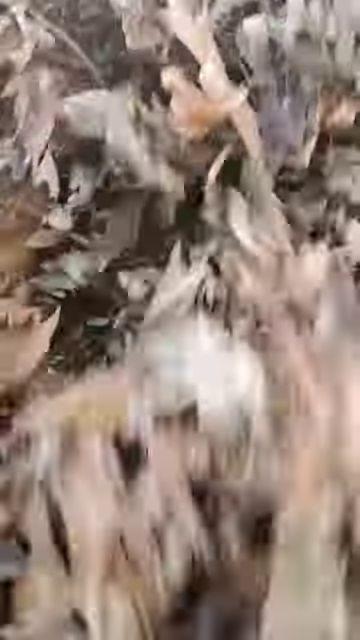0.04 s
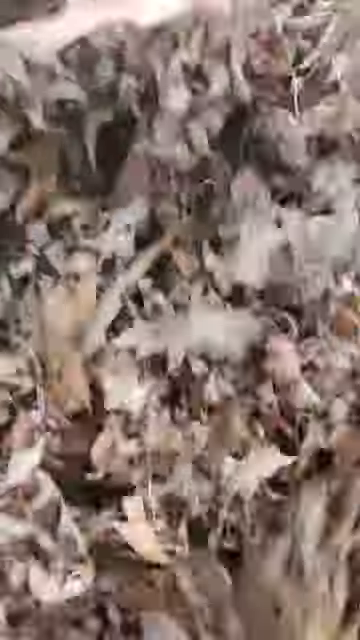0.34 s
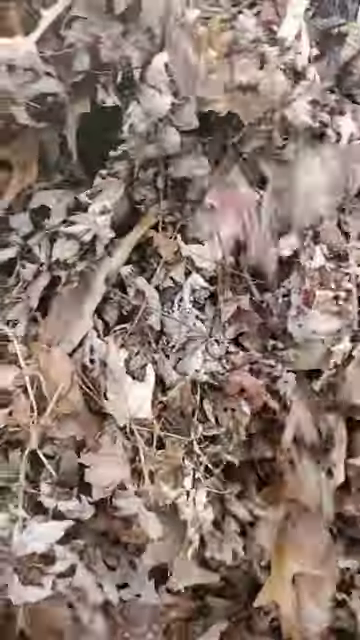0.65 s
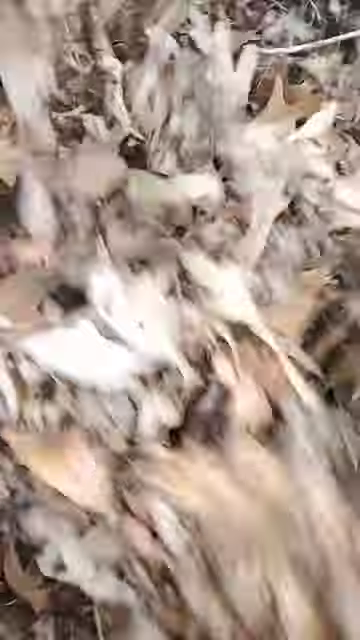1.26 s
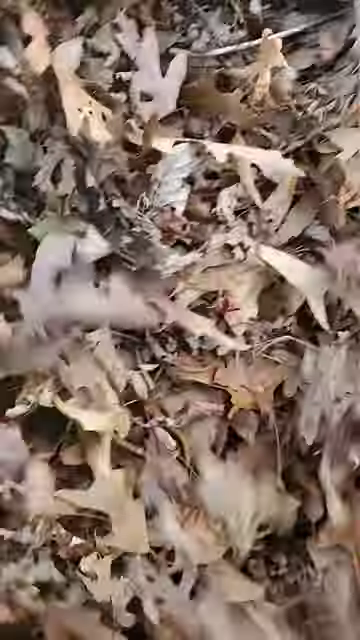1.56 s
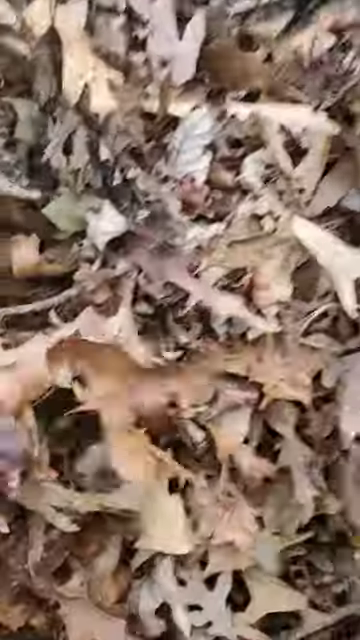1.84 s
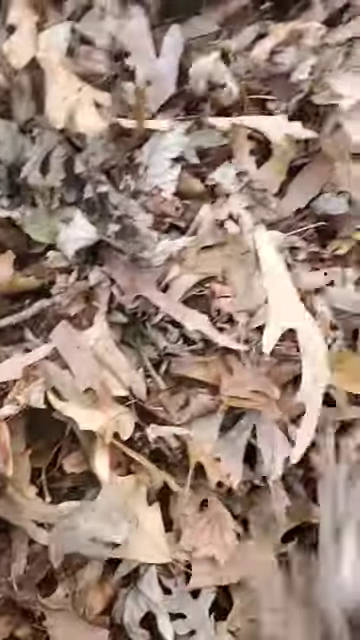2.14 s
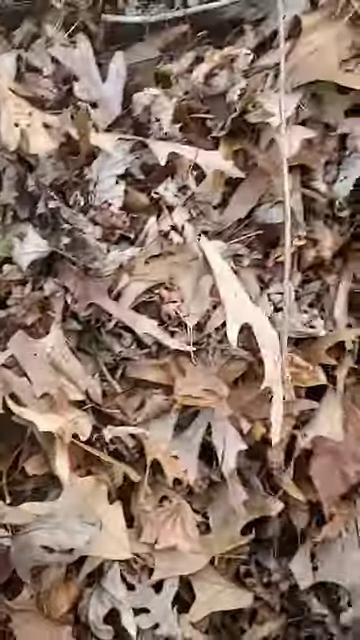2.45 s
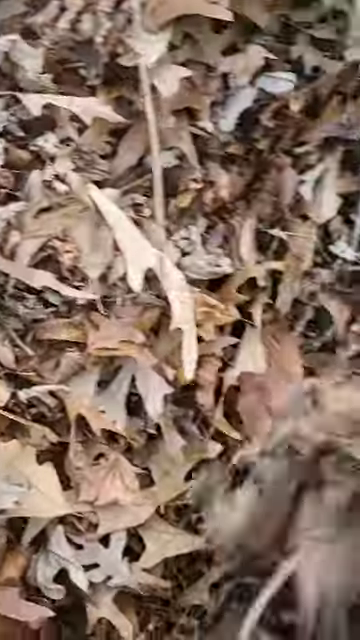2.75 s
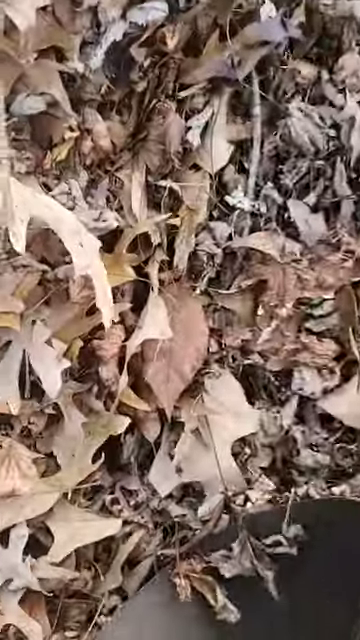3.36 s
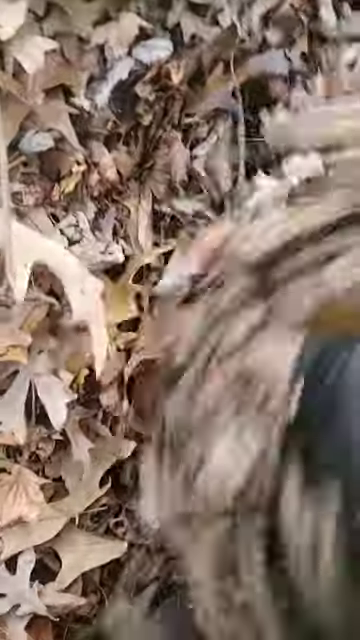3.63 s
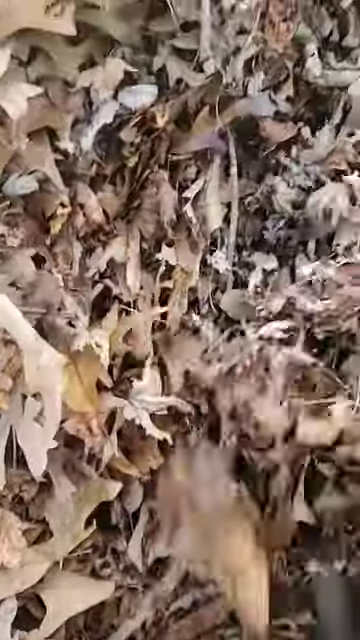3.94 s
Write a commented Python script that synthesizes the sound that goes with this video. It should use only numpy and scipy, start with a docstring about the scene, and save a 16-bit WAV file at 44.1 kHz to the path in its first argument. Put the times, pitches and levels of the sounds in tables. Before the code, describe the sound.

A petrol leaf vacuum runs close by throughout, a loud hum over engine throb and rushing air, while dry leaves sizzle and rattle up the hose. Near 0.25 seconds the air surges and the hum sags. Clumps crunch around 0.85 seconds, the sizzle swells at 1.5, and more crunches come near 1.9. A leaf snaps at 2.4; after crunches at 2.55 and 3.25, the leaves thin briefly.

```python
"""A petrol leaf vacuum runs flat out, close by, its hose sucking up dry leaves. From the start the
four-blade impeller hums over the engine's throb and a roar of air, while leaves sizzle at the mouth
and rattle up the hose. Near 0.25 s a wad is swallowed: the roar surges and the hum sags under load.
Clumps crunch against the hose wall around 0.85 s, the sizzle swells at 1.5 s and more clumps follow.
A leaf snaps sharply at 2.4 s; after crunches near 2.55 s and 3.25 s the leaves thin out briefly."""
import sys
import numpy as np
from scipy import signal
from scipy.fft import rfft, irfft
from scipy.io import wavfile
from scipy.ndimage import uniform_filter1d, minimum_filter1d

SR = 44100
rng = np.random.default_rng(int(sys.argv[2]) if len(sys.argv) > 2 else 0)


def store_pcm(level_fs):
    """Save levels as 16-bit WAV."""
    pcm = np.round(np.clip(level_fs, -1, 1) * 32767).astype(np.int16)
    wavfile.write(sys.argv[1], SR, np.atleast_2d(pcm).T)


N = 176400
T, HZ = np.arange(N) / SR, np.fft.rfftfreq(N, 1 / SR)
BLADES, TOP_HZ = 4, 15600


def amp(db):
    """Decibels to gain."""
    return 10 ** (np.asarray(db) / 20)


def unit(x):
    """Scales to rms 1."""
    return x / np.sqrt(np.mean(x ** 2) + 1e-20)


def curve(points):
    """Automation: straight lines between (time [s], value) rows."""
    return np.interp(T, *np.transpose(points))


def spectrum(points):
    """Joins (frequency [Hz], value) rows on a log-frequency axis."""
    hz, value = np.transpose(points)
    return np.interp(np.log(HZ + 1), np.log(hz + 1), value)


def bumps(rows):
    """Bell-shaped swells or dips, one for each (time [s], half-width [s], height) row."""
    return sum(height * np.exp(-((T - time) / width) ** 2) for time, width, height in rows)


def spike(time, attack_s, decay_s):
    """An envelope that rises exponentially to 1 at the given time, then dies away."""
    return np.exp(-abs(T - time) / np.where(T < time, attack_s, decay_s))


def drift(rate_hz):
    """Slow random motion of rms 1."""
    return unit(irfft(rfft(rng.standard_normal(N)) / (1 + (HZ / rate_hz) ** 4), N))


def pan_gains(pan_db):
    """Left and right gains with a mean of 1."""
    gains = np.array([amp(pan_db / 2), amp(-pan_db / 2)])
    return gains / gains.mean(0)


def flicker(x, depth_db, rate_hz, bands, low_hz=1000):
    """Lets each band of the spectrum flicker on its own."""
    bins, centres = rfft(x), np.geomspace(low_hz, TOP_HZ, bands)
    split = (irfft(bins * spectrum(list(zip(centres, band))), N) for band in np.eye(bands))
    return unit(sum(band * amp(depth_db * drift(rate_hz)) for band in split))


def resonate(x, hz, width_hz):
    """A broad resonance of gain 1 that sweeps along the curve hz."""
    carrier = np.exp(2j * np.pi * np.cumsum(hz) / SR)
    pole = np.exp(-np.pi * width_hz / SR)
    return 2 * (carrier * signal.filtfilt([1 - pole], [1, -pole], x / carrier)).real


# Stereo image, tight lows and wide highs (frequency [Hz], left-right correlation [0..1])
CORRELATION = [(50, 1), (300, 0.97), (550, 0.87), (1000, 0.63), (2000, 0.39), (2800, 0.41), (4000, 0.19),
               (9000, .1)]
# Phase between the sides (frequency [Hz], lag of the left [rad])
LEFT_LAG = [(60, .2), (240, 0.65), (780, 1.0), (1100, 1.66), (1720, 3.5), (2100, 3.5), (2840, 4),
            (7000, 11)]


def place(pair, eq, pan):
    """Equalises two unrelated signals and blends them to stereo; the mono mix has the input's level."""
    left, other = rfft(pair)
    shared = np.clip(spectrum(CORRELATION), 0, 1)
    right = (shared * left + np.sqrt(1 - shared ** 2) * other) * np.exp(1j * spectrum(LEFT_LAG))
    stereo = irfft(np.array([left, right]) * unit(amp(spectrum(eq))) * pan_gains(spectrum(pan)), N)
    return stereo * pair.std() / stereo.mean(0).std()


# Fader of the air bed (time [s], level [dB])
ROAR_FADER = [(0, -32), (.6, -29.5), (1.3, -30), (1.9, -29), (2.3, -30), (2.8, -28.5), (3.3, -29),
              (4, -30.5)]
# Surges as a wad is swallowed (time [s], half-width [s], gain [dB])
ROAR_GULPS = [(0.228, 0.047, 6.5), (0.828, 0.026, 1), (1.988, 0.022, 2), (2.555, .025, 4), (3.26, .05, 0)]
# Bass-heavy tone of the air (frequency [Hz], relative level [dB])
ROAR_EQ = [(20, -39.5), (36, -24), (60, -2.5), (110, -7), (170, 1), (280, -2.5), (400, -5.5), (540, -12),
           (700, -12), (800, -20), (1050, -16.5), (1500, -24.5), (2000, -25), (2600, -28), (6000, -44.5),
           (16000, -51.5)]
# Position of the air and the wads it carries (frequency [Hz], left minus right [dB])
AIRFLOW_PAN = [(50, 5.5), (200, -4.5), (1200, -4.5), (3000, -3.5), (8000, -3.5), (15000, 0)]


def roar(angle):
    """Turbulent air, pulsing with the shaft and surging at each gulp."""
    air = flicker(rng.standard_normal((2, N)), depth_db=1.47, rate_hz=14, bands=20, low_hz=292)
    pulse = 1 + 0.078 * (np.cos(angle) + np.cos(2 * angle) + np.cos(BLADES * angle))
    return place(air, ROAR_EQ, AIRFLOW_PAN) * unit(pulse) * amp(curve(ROAR_FADER) + bumps(ROAR_GULPS))


def crackle(per_s, spread_db, hiss, grain_s):
    """Countless tiny leaf fractures of random size, over the hiss of those too small to tell apart."""
    onsets = rng.random(N) < per_s / SR
    sizes = amp(spread_db * np.minimum(rng.exponential(1, N), 5))
    power = signal.lfilter([1], [1, -np.exp(-2 / (grain_s * SR))], (onsets * sizes) ** 2)
    return unit(np.sqrt(power / power.mean() + hiss ** 2) * rng.standard_normal((2, N)))


# Cues for wads entering the hose (time [s], half-width [s], level [dB])
WAD_CUES = [(0.274, 0.17, -43), (0.507, 0.022, -40), (0.85, 0.12, -43.5), (3.013, .04, -45),
            (3.25, 0.11, -43)]
# Midrange body of the scrape (frequency [Hz], relative level [dB])
WAD_EQ = [(400, -6.5), (700, -1), (1200, -1), (1800, -2.5), (2500, -5), (3600, -11.5), (8000, -31),
          (16000, -44.5)]


def wads():
    """Thick wads of leaves scrape with a low, coarse grain as they squeeze in."""
    envelope = bumps((time, width, amp(db)) for time, width, db in WAD_CUES)
    scrape = crackle(per_s=990, spread_db=1.0, hiss=0.94, grain_s=0.0022)
    return envelope * place(scrape, WAD_EQ, AIRFLOW_PAN)


# Cues for single leaves snapping (time [s], peak level before EQ [dB])
SNAP_CUES = [(.664, -36.5), (.732, -39), (.815, -37), (.848, -32.5), (1.004, -39), (2.402, -28),
             (3.18, -37.5), (3.273, -35), (3.457, -36.5), (3.58, -37), (3.625, -39)]


def snaps():
    """Dry leaves break with a sharp tick of noise."""
    envelope = sum(amp(db) * spike(time, attack_s=0.0008, decay_s=0.0042) for time, db in SNAP_CUES)
    return envelope * rng.standard_normal((2, N))


# Fader of the sizzle (time [s], level before trim [dB])
SIZZLE_FADER = [(0, -41), (.22, -41), (.53, -42.5), (.61, -46), (.67, -44), (.86, -43), (.92, -45.5),
                (1.07, -43.5), (1.19, -50), (1.28, -39), (1.52, -36), (1.68, -38), (1.73, -44),
                (2.02, -39.5), (2.11, -41.5), (2.16, -37.8), (2.56, -39), (2.62, -43.7), (2.82, -42.5),
                (2.9, -39.3), (3.03, -39.3), (3.08, -44.8), (3.28, -46), (3.36, -50), (3.59, -53.5),
                (3.68, -42), (3.97, -39.5)]
# Crisp, airy top of the leaves at the mouth (frequency [Hz], relative level [dB])
MOUTH_EQ = [(1000, -26.5), (2000, -14), (3000, -5), (6000, -8.5), (8500, -8.5), (10000, -5), (12000, -0.5),
            (14000, -1.5), (15500, 0)]
# Their stereo spread (frequency [Hz], left minus right [dB])
MOUTH_PAN = [(2500, 0), (5000, -8.5), (8000, 3.5), (10500, 0.5), (12500, 6.5), (15000, 15.5)]


def mouth(trim_db=1.5):
    """Loose leaves sizzle and snap in the draught at the hose's mouth."""
    leaves = crackle(per_s=6000, spread_db=1, hiss=0.67, grain_s=0.00047)
    sizzle = flicker(leaves, depth_db=1.8, rate_hz=36, bands=24) * amp(curve(SIZZLE_FADER) + trim_db)
    return place(sizzle + snaps(), MOUTH_EQ, MOUTH_PAN)


# Cues for hits on the hose wall (time [s], peak level before EQ [dB], attack [s], decay [s], centre [Hz])
CRUNCH_CUES = [(.503, -35, .008, .014, 2900), (.817, -29, .003, .01, 4700), (.838, -31.5, .01, .016, 4000),
               (.927, -35.5, .007, .01, 4200), (1.005, -30, .006, 0.008, 4720),
               (1.056, -33.5, .004, .008, 4213), (1.445, -38, .008, .015, 2300),
               (1.491, -35.5, .004, .007, 4530), (1.831, -29, .007, .022, 3630),
               (1.892, -34.5, .012, .014, 4300), (2.002, -30, .008, 0.013, 5700),
               (2.467, -35.5, 0.019, .015, 3500), (2.542, -29, .007, .016, 3400),
               (2.582, -31, 0.0067, 0.012, 3500), (2.722, -36.5, .018, .012, 4410),
               (2.844, -33.5, .004, .007, 5200), (3.191, -35.5, .004, .008, 3600),
               (3.222, -31.5, 0.0055, .014, 4630), (3.272, -28.5, .003, .007, 4500),
               (3.343, -34.5, 0.0045, 0.025, 4620)]


def crunches(width_hz=1600):
    """Clumps and twigs fold against the wall: each burst of fractures builds, then dies fast."""
    hits = np.zeros((2, N))
    for time, db, attack_s, decay_s, centre_hz in CRUNCH_CUES:
        burst = rng.standard_normal((2, N)) * spike(time, attack_s, decay_s)
        bell_eq = 0.37 + 1.18 / (1 + ((HZ - centre_hz) / (width_hz / 2)) ** 2)
        hits += amp(db) * irfft(rfft(burst) * bell_eq, N)
    return hits


# Fader of the rattle (time [s], level before trim [dB])
RATTLE_FADER = [(0, -42.5), (.11, -45), (.22, -41.5), (.53, -41.5), (.61, -47), (.66, -40.5), (.8, -39.5),
                (.85, -37), (.89, -41), (1.03, -41), (1.16, -45.5), (1.48, -41.5), (1.79, -40),
                (1.86, -36.5), (2.01, -36), (2.1, -45), (2.18, -39.5), (2.38, -44.5), (2.53, -38.5),
                (2.65, -38.5), (2.82, -40.5), (2.92, -44.5), (3.02, -39.5), (3.07, -45.5), (3.17, -44),
                (3.24, -37), (3.32, -41.5), (3.56, -49.5), (3.97, -41.5)]
# Resonance sweep, low for big clumps and high for small scraps (time [s], centre [Hz])
CLUMP_SWEEP = [(0, 4540), (.25, 2910), (.5, 3800), (.8, 4640), (1.05, 4520), (1.6, 3840), (1.85, 3600),
               (2.0, 5390), (2.25, 3940), (2.55, 3410), (2.75, 4620), (3.0, 4400), (3.3, 4880),
               (3.95, 4200)]
# Upper-mid bite of the leaves in the hose (frequency [Hz], relative level [dB])
HOSE_EQ = [(300, -26.5), (1400, -6), (2000, -3.5), (2800, -2), (3600, -5), (4700, -2.5), (6000, -3),
           (8000, -9), (11000, -13.5), (16000, -23.5)]
# Their stereo spread (frequency [Hz], left minus right [dB])
HOSE_PAN = [(1500, -4), (3200, -1), (4800, -5), (6500, 0), (8000, 5.5), (15000, 8.5)]


def hose(trim_db=-1):
    """Leaves and twigs scrape and knock along the hose, coloured by the size of the passing clump."""
    leaves = crackle(per_s=2700, spread_db=2, hiss=1, grain_s=0.00077)
    rattle = flicker(leaves, depth_db=2.0, rate_hz=35, bands=22) * amp(curve(RATTLE_FADER) + trim_db)
    clumps = 0.57 * resonate(rattle, curve(CLUMP_SWEEP), width_hz=2660)
    return place(rattle + clumps + crunches(), HOSE_EQ, HOSE_PAN)


def shaft_tone(angle, order):
    """A sine of rms 1 and random phase, locked to a multiple of the shaft speed."""
    return np.sqrt(2) * np.sin(order * angle + 2 * np.pi * rng.random())


# Partials of the engine (order [multiple of shaft speed], level before trim [dB])
ENGINE_PARTIALS = [(1, -37.5), (1.5, -42.5), (2, -39.5), (2.5, -46.5), (3, -36.5), (4.5, -40.5), (5, -43.5),
                   (5.5, -50), (6, -43.5), (6.5, -56.5), (9, -52.5), (10, -49), (12, -59)]


def engine(angle, roughness=0.47, trim_db=-1):
    """A four-stroke fires every second turn, so it throbs on half orders as well as whole ones."""
    return sum(amp(db + trim_db) * shaft_tone(angle, order) * (1 + roughness * drift(rate_hz=15))
               for order, db in ENGINE_PARTIALS)


# Fader of the hum, swelling and fading as the hose is moved about (time [s], level [dB])
HUM_FADER = [(0, -12), (.44, -11.6), (.73, -8.5), (.95, -9), (1.13, -6.5), (1.42, -6), (1.54, -9),
             (1.68, -8), (1.82, -9.5), (1.97, -9), (2.22, -6.5), (2.52, -6.5), (2.68, -9), (3.0, -6),
             (3.22, -5.5), (3.36, -7), (3.65, -5), (3.85, -7.5), (4, -6)]
# A brief dip in the hum (time [s], half-width [s], gain [dB])
HUM_DIPS = [(1.815, 0.017, -2)]
# Fader of the hum's octave (time [s], level before trim [dB])
OCTAVE_FADER = [(0, -34.5), (.22, -34), (.36, -47.5), (.8, -37.5), (.94, -41), (1.06, -34.5), (1.28, -33.5),
                (1.42, -34.5), (1.64, -35.5), (1.74, -40.5), (1.9, -41), (2.0, -35), (2.17, -33.5),
                (2.4, -37), (2.64, -36), (2.83, -31), (3.05, -33.2), (3.28, -33.2), (3.42, -32),
                (3.6, -32.4), (4, -32.6)]


def impeller(angle, flutter=0.03, octave_trim_db=1):
    """The passing blades chop the air into a loud hum and a faint octave above it."""
    hum = shaft_tone(angle, BLADES) * amp(curve(HUM_FADER) + bumps(HUM_DIPS))
    octave = shaft_tone(angle, 2 * BLADES) * amp(curve(OCTAVE_FADER) + octave_trim_db)
    return (hum + octave) * (1 + flutter * drift(rate_hz=25))


# Position of the motor, right of centre (time [s], left minus right [dB])
MOTOR_POSITION = [(0, -5.5), (.8, -4.5), (1.25, -5), (2.3, -5), (2.75, -4.7), (3.2, -4), (4, -5)]


def motor(shaft_hz, angle, left_delay_s=0.00025):
    """Impeller and engine turn on one shaft; their sound reaches the left side slightly later."""
    angles = np.array([angle - 2 * np.pi * shaft_hz * left_delay_s, angle])
    return (impeller(angles) + engine(angles)) * pan_gains(curve(MOTOR_POSITION))


# Pitch of the hum, sagging a little under load (time [s], blade-passing frequency [Hz])
BLADE_PITCH = [(0, 240.2), (.14, 236.4), (.31, 228), (.45, 232.3), (.7, 234.5), (.91, 233.1), (1.1, 236.3),
               (1.42, 236.1), (1.6, 236.9), (1.7, 232.1), (1.93, 232.6), (2.22, 236.3), (2.47, 236.5),
               (2.63, 233.4), (2.95, 236.7), (3.2, 236.7), (3.32, 233.6), (3.5, 235.4), (3.97, 237.8)]


def scene():
    """One slightly wavering shaft speed drives motor and air; the leaves sound on top."""
    blade_hz = curve(BLADE_PITCH) + 0.4 * drift(rate_hz=26.5)
    shaft_hz = blade_hz / BLADES
    angle = 2 * np.pi * np.cumsum(shaft_hz) / SR
    return motor(shaft_hz, angle) + roar(angle) + wads() + hose() + mouth()


def record(dry):
    """A fast limiter holds the highest crests of the hum; a steep low-pass trims the very top."""
    ceiling, window_samples = 0.99, 300
    safe_gain = np.minimum(1, ceiling / (abs(dry).max(0) + 1e-9))
    smooth_gain = uniform_filter1d(minimum_filter1d(safe_gain, window_samples), window_samples)
    low_pass = signal.firwin(511, TOP_HZ, window=("kaiser", 9), fs=SR)
    return signal.oaconvolve(dry * smooth_gain, low_pass[None], "same")


dry = scene()
out = record(dry)
store_pcm(out)
```